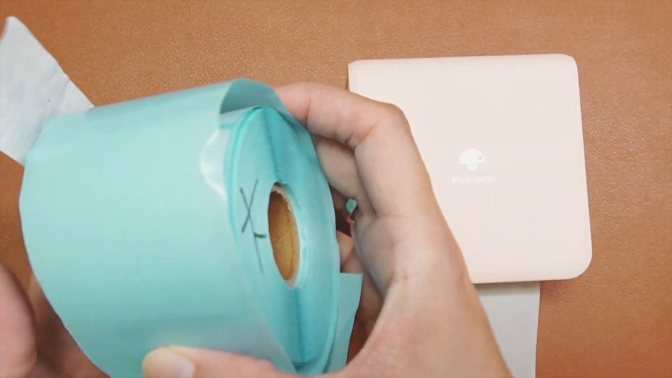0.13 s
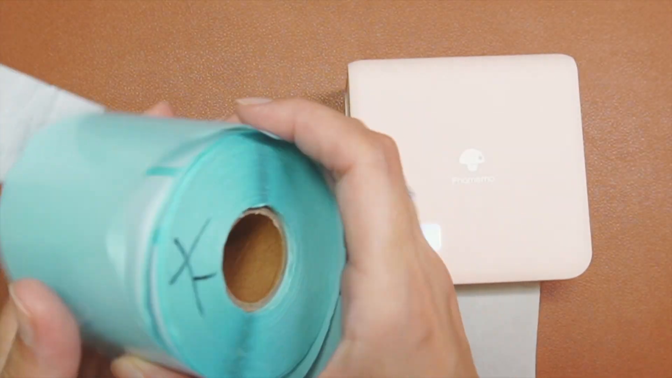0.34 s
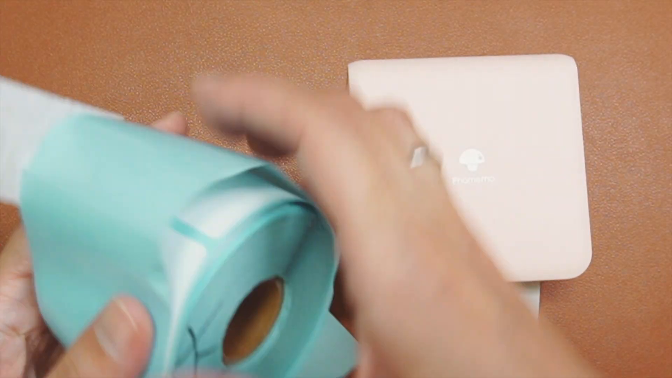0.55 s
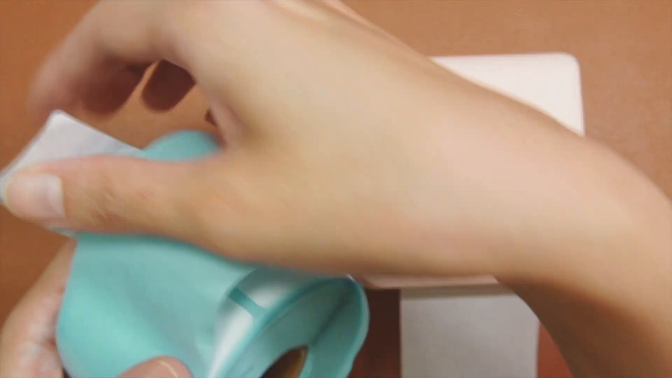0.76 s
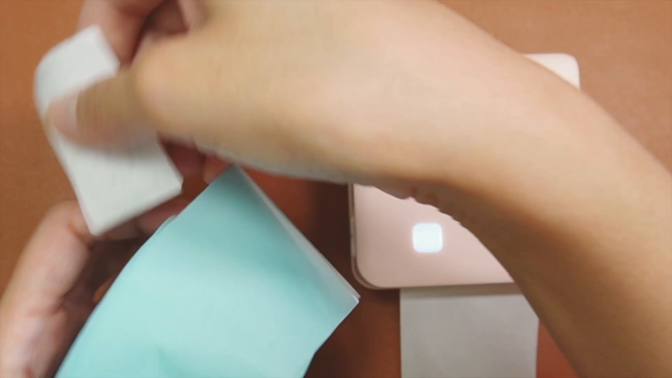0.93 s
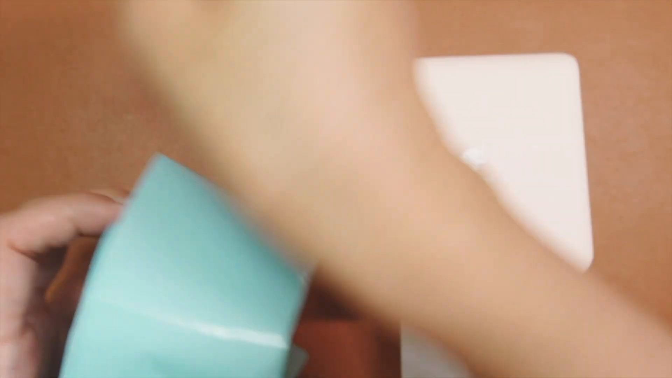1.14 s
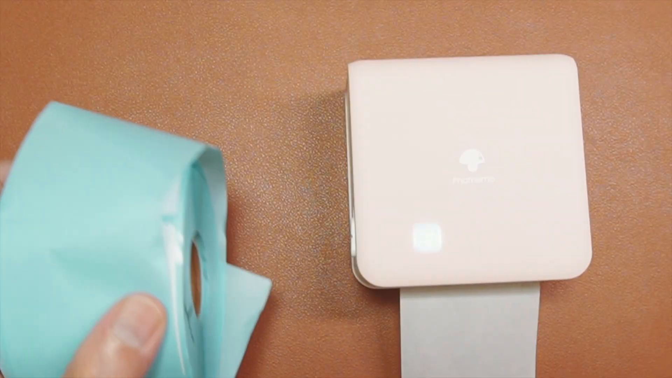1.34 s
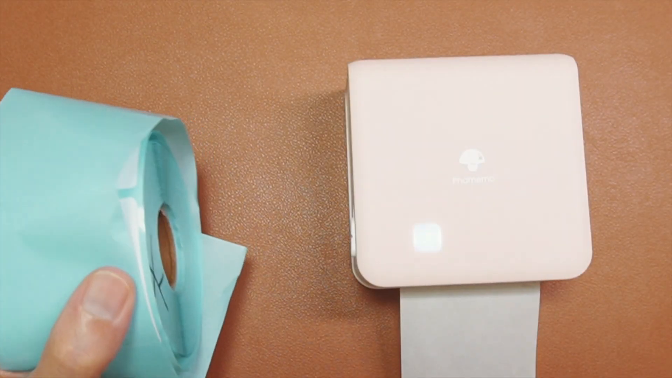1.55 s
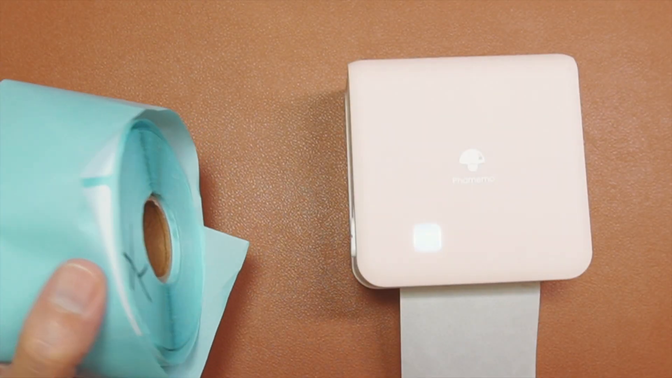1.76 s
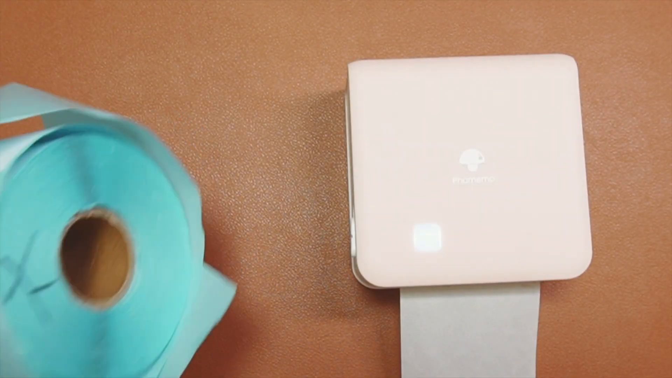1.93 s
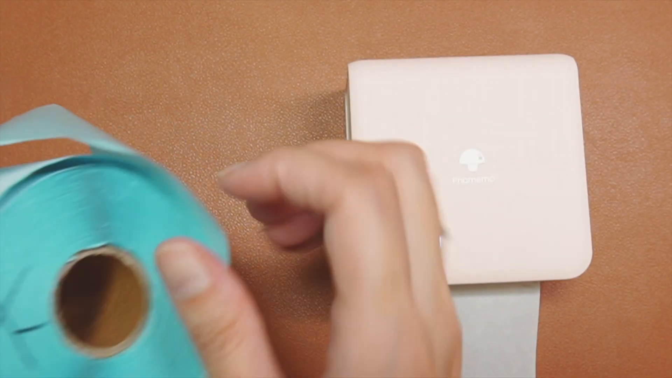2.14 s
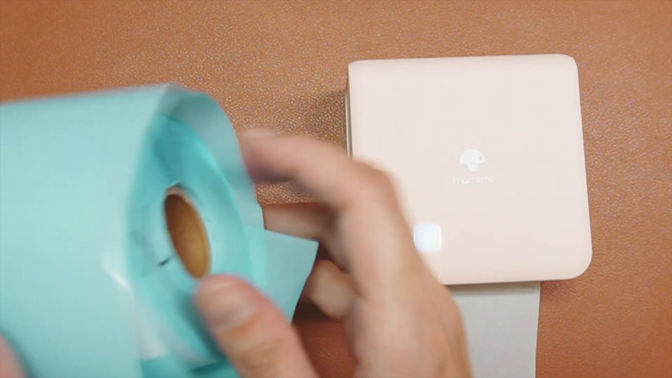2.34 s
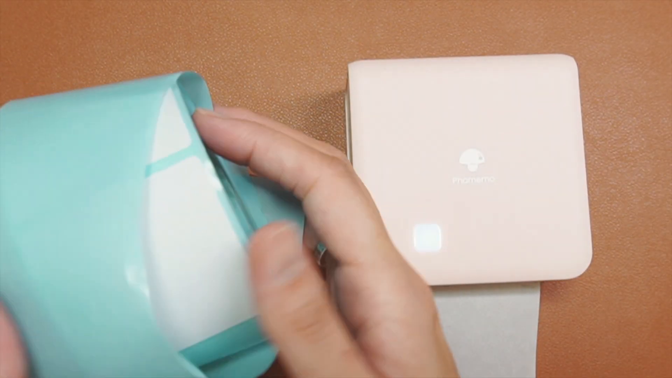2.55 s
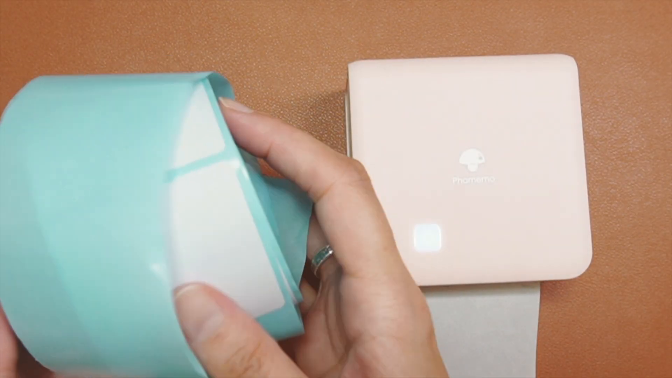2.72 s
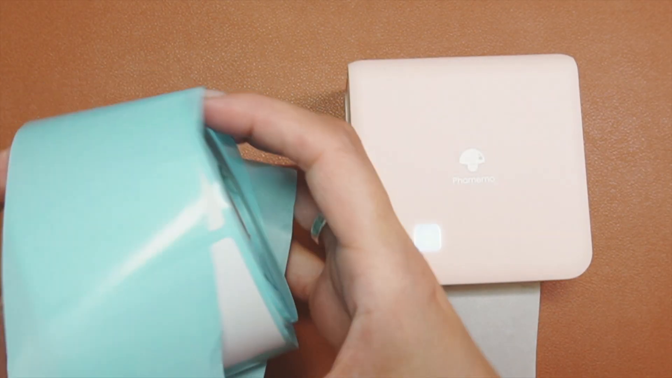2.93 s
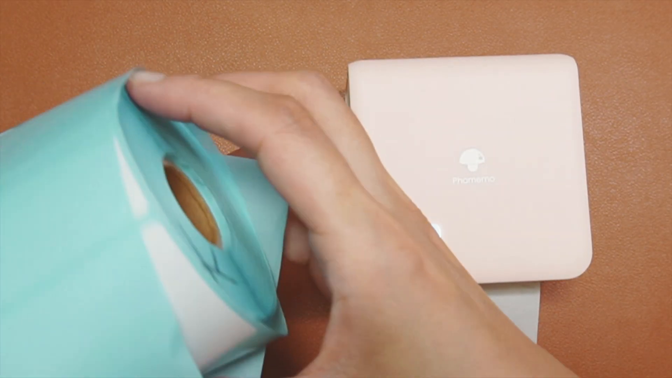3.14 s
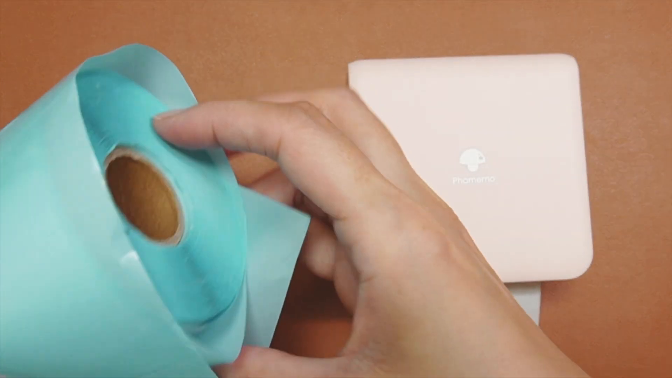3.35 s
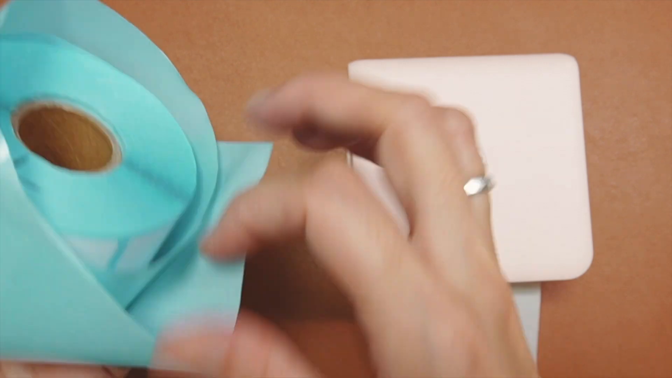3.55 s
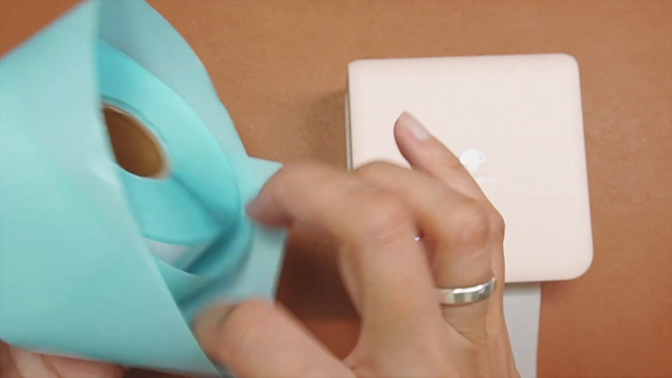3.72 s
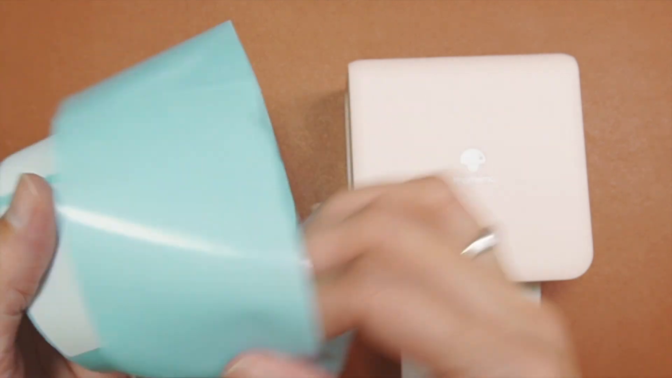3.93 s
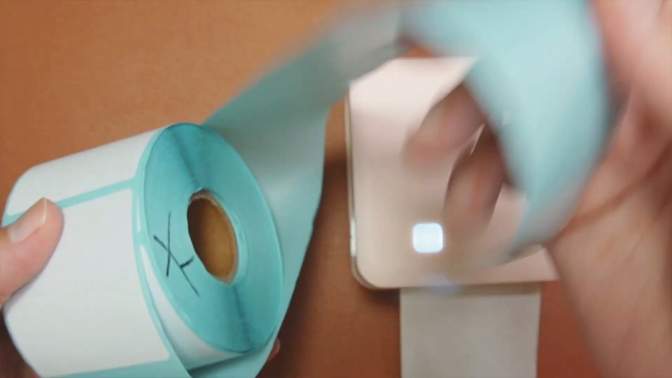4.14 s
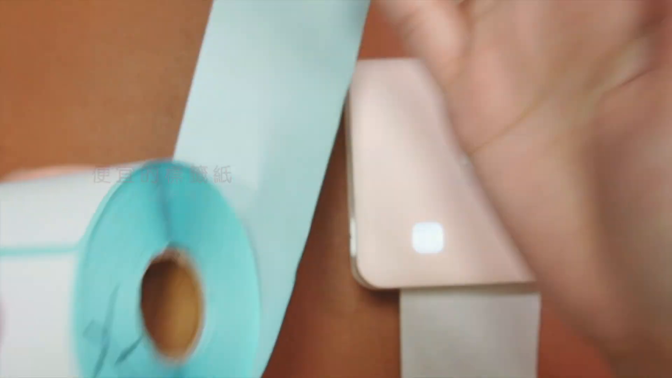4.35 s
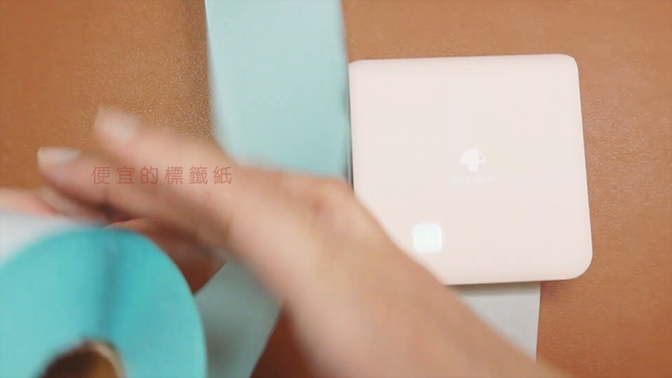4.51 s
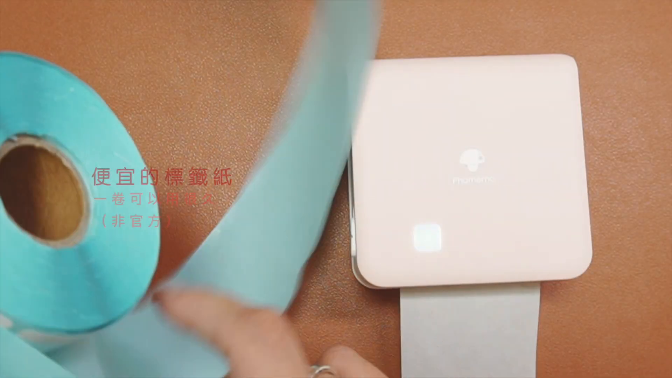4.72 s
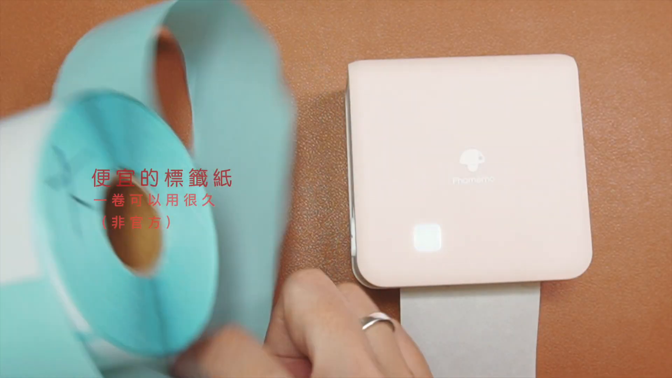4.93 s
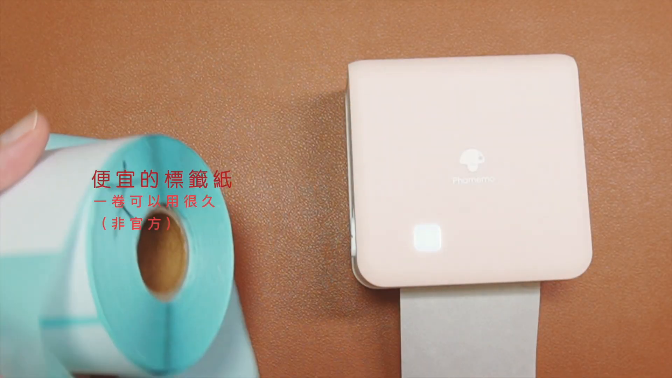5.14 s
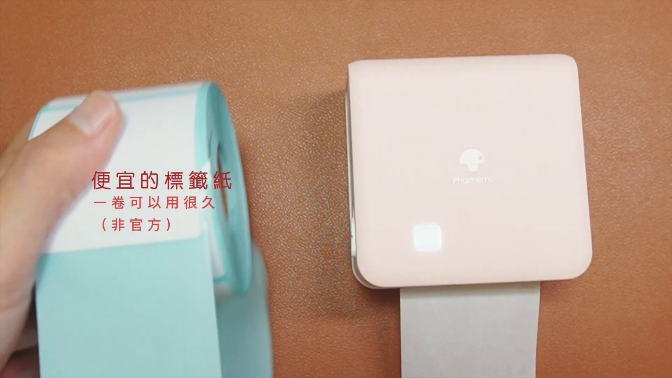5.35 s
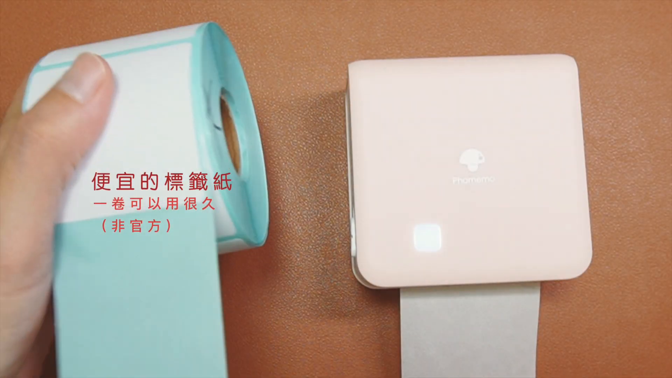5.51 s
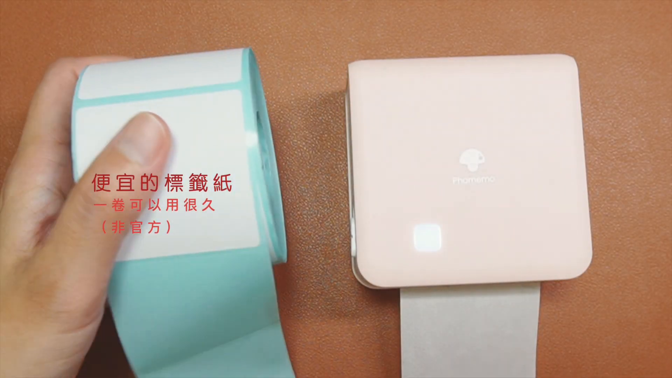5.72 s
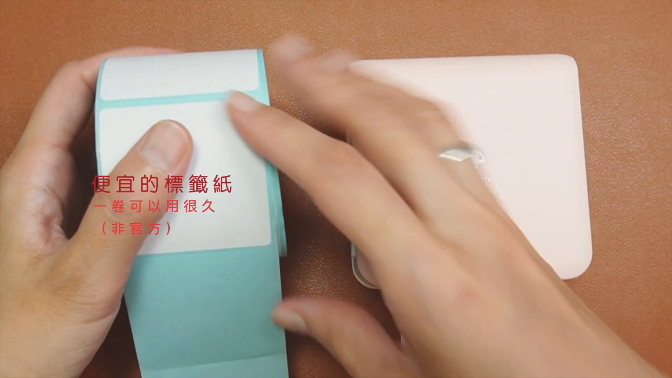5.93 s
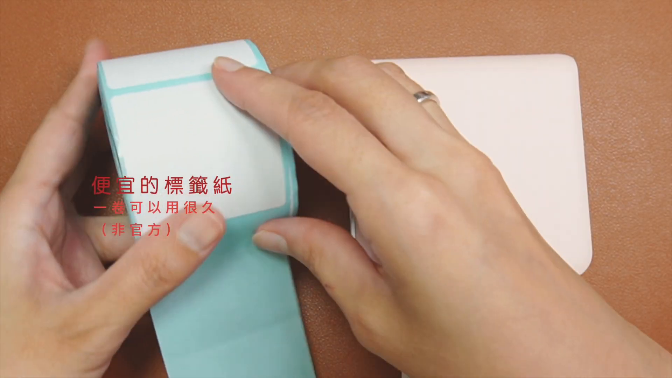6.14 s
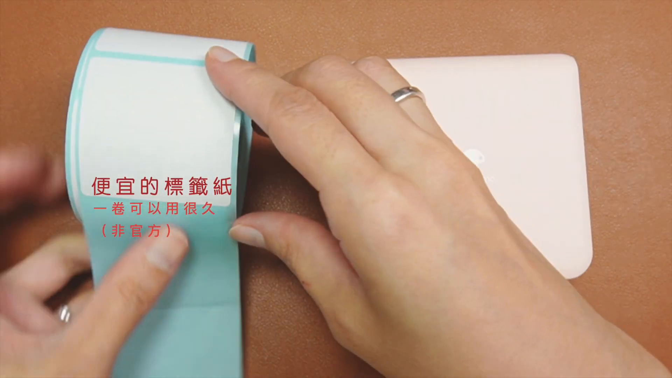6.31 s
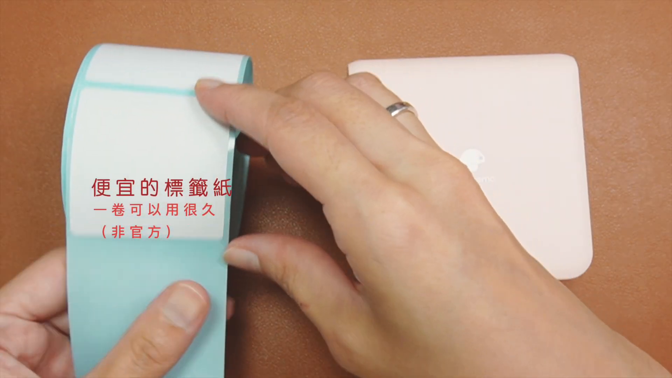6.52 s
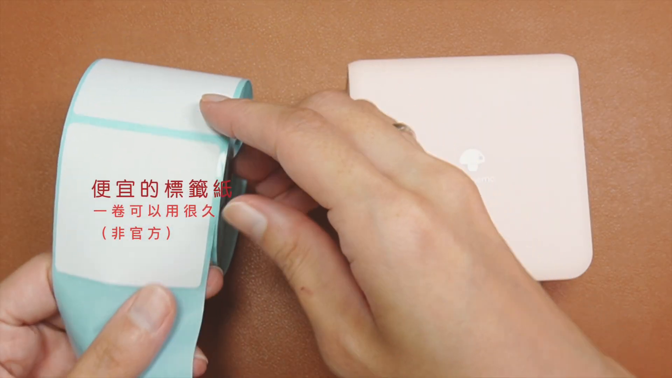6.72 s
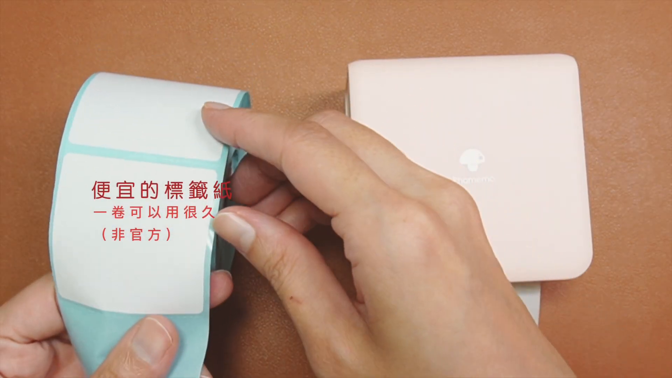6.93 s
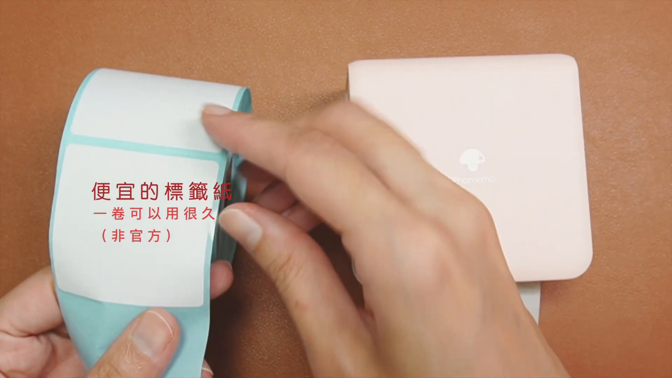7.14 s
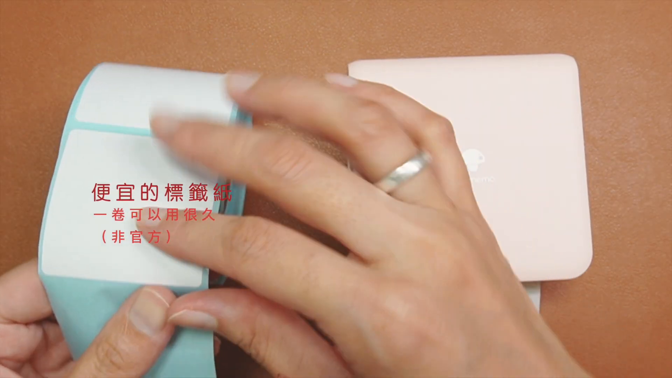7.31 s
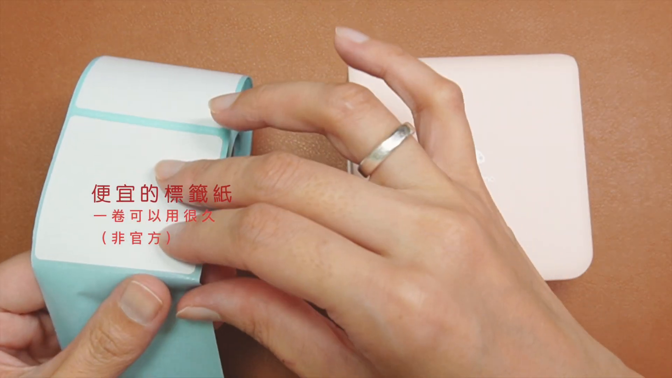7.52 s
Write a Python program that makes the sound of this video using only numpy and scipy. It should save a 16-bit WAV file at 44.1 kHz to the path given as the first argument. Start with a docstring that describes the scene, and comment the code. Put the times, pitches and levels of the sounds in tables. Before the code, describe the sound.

Close up on the left in a small quiet room, hands handle a roll of stiff label paper. Sparse soft rubs and crinkles come first, then a near pause, then firmer rustling. The middle grows into dense crackling and loud sliding as the strip is pulled loose, before fading to light isolated rubs and ticks over very faint room noise.

```python
"""At a desk in a small quiet room, hands turn a roll of label paper, pull its loose end free and wind it back.
The stiff strip slides over itself and the fingers: random grains make a hiss, coloured as the strip bends.
Creases large and small buckle as short runs of clicks, and dull knocks of fading noise sound, the low ones from
the roll. Scattered echoes answer over faint steady room noise; all of it is louder on the left."""
import sys
import numpy as np
from scipy import signal
from scipy.fft import rfft, irfft
from scipy.io import wavfile
from scipy.ndimage import uniform_filter1d

SR = 44100
rng = np.random.default_rng(int(sys.argv[2]) if len(sys.argv) > 2 else 0)


def persist_wave(psi):
    """Save psi, clipped to +-1, as 16-bit WAV."""
    counts = np.round(np.clip(psi, -1, 1) * 32767).astype(np.int16)
    wavfile.write(sys.argv[1], SR, np.atleast_2d(counts).T)


N = 338247

# strokes of sliding paper: start t/s, length t/s, level/dB, swell over the length/dB, body/dB, air/dB,
# ring of the curled strip f/Hz, ring level/dB, small crinkles/(1/s)
STROKE_ROWS = [(0.0, 0.087, -58.5, -4, 0, 3.5, 3610, 4.5, 10),
               (0.092, 0.086, -65, 10, -13, -4, 1420, 10, 14), (0.251, 0.13, -66, 5.5, -7, 2, 1870, 7, 17),
               (0.41, 0.024, -47.5, -5.5, -9, 2.5, 2410, 0, 41),
               (0.455, 0.112, -46.5, 0.5, -4, -1, 2100, 6.5, 7.5),
               (0.582, 0.068, -44, 3, -3, 1, 2230, 9.5, 16),
               (0.773, 0.076, -54.5, 7.5, 0, -0.5, 2640, 9, 26),
               (0.901, 0.14, -43.2, -11, 0.5, -1, 1000, 5, 22.5),
               (1.221, 0.035, -63, 8, -10, 1, 2120, 9, 32),
               (1.562, 0.12, -63.5, 7.5, 9, 6.5, 1010, 3, 16.5),
               (1.693, 0.21, -49, -14, 15, -4, 1650, 2, 28.5),
               (1.915, 0.075, -55, 1.5, 1, -2, 7130, 4, 14.5), (2.03, 0.2, -62, -9.5, 1, -8, 3590, 4, 16),
               (2.204, 0.078, -47.5, 3, -3, -5.5, 6540, 8, 12.5),
               (2.279, 0.12, -44, -2, 1.5, 3.5, 3250, 7.5, 3.5),
               (2.422, 0.14, -55.5, 16.5, 1, -0.5, 1730, 3, 6),
               (2.532, 0.11, -46.5, -6, -1, 1.5, 1880, 8, 11), (2.703, 0.171, -47, -8, -6, 0, 1650, 6, 18),
               (2.841, 0.24, -48, 5, -4.5, 0.5, 1800, 7, 21.5),
               (3.131, 0.23, -49.4, -3.5, -7.5, -1, 1770, 8.5, 14),
               (3.299, 0.089, -40.5, 2.5, -9, 0.5, 7020, 3, 0),
               (3.431, 0.11, -39.5, -5.5, -5, 4, 3150, 7, 9.5),
               (3.565, 0.066, -54, 4.5, -1, -1, 1000, 8, 0), (3.68, 0.17, -43.1, -20, -4, 4.5, 2030, 8, 14),
               (3.774, 0.077, -40, -15, 3, -2, 3300, 4, 16),
               (3.848, 0.15, -40.5, -4.5, 2.5, 3.5, 3260, 3, 5.5),
               (4.002, 0.15, -51.5, 9, 1, -3, 2880, 7.5, 17.5), (4.136, 0.099, -47, 0, -4, 7, 990, 0, 22),
               (4.253, 0.037, -41.5, 0.5, -15, 6.5, 1000, 4, 0),
               (4.324, 0.056, -63.5, 15, 6, -33, 3390, 3, 14), (4.4, 0.093, -41, 3.5, -1, -4, 990, 9, 35.5),
               (4.509, 0.15, -40.5, 3.5, 0, -3, 2500, -1.5, 21),
               (4.712, 0.22, -38, -7, 4, -1, 2030, 1, 18.5), (4.974, 0.2, -34.5, -15, 2, -0.5, 2540, 2, 4),
               (5.176, 0.055, -50.5, 0, 0, -1, 3600, 5, 0), (5.213, 0.14, -44, -2.5, -1.5, 1.5, 2560, 6, 0),
               (5.362, 0.081, -34, -7, 1.5, 0, 2360, 7.5, 13.5),
               (5.454, 0.16, -43.5, -5, -7, 0.5, 1110, 6, 14),
               (5.585, 0.067, -34.5, -12.5, 6, 0, 4720, 7, 14),
               (5.709, 0.22, -49, -10, 1.5, -13, 5550, 5.5, 22),
               (5.952, 0.099, -67, 21, 5, 3.5, 1750, 3, 22), (6.083, 0.37, -54, 1, -2, 1, 1920, 8, 12),
               (6.481, 0.14, -52.6, 2, -1.5, -5.5, 5640, 5, 21),
               (6.59, 0.15, -57.5, 4, 3.5, -8.5, 1620, 2, 16.5),
               (6.746, 0.16, -64, 6, 1, -6.5, 990, 1, 9.5),
               (7.127, 0.068, -59, 9.5, -6, -0.5, 3160, 9.5, 13),
               (7.231, 0.132, -60.5, 4, -3, -3, 2480, 5.5, 8),
               (7.376, 0.064, -48.5, -7, -3.5, -1, 2900, 4, 16),
               (7.446, 0.208, -56, -5.5, 4, -5.5, 7260, 5, 14.5)]


def gain_of(db):
    """Turns decibels into an amplitude factor."""
    return 10 ** (np.asarray(db) / 20)


def evened(x):
    """Scales a signal to an average strength (rms) of 1."""
    return x / np.sqrt(np.mean(x ** 2) + 1e-20)


def read(points, hz):
    """Reads a table between its points, along a logarithmic frequency axis."""
    f, value = np.transpose(points)
    return np.interp(np.log(hz + 1), np.log(f + 1), value)


def coloured(x, points):
    """Filters a sound by a table of frequency and level."""
    gain = gain_of(read(points, np.fft.rfftfreq(N, 1 / SR)))
    return irfft(rfft(x) * gain, N)


def add(mix, s, sound):
    """Adds a sound into the mix, starting at s seconds."""
    part = mix[max(round(s * SR), 0):][:len(sound)]
    part += sound[:len(part)]


def causal(db):
    """Builds the filter with these levels that answers at once and then rings out (minimum phase)."""
    log_gain = np.log(gain_of(np.r_[db, db[-2:0:-1]]))
    return np.exp(np.conj(signal.hilbert(log_gain)))[:len(db)]


def ripple(shape, size):
    """Makes smooth random hills and dips along the first axis, with rms 1."""
    noise = rng.standard_normal(shape)
    smooth = uniform_filter1d(noise, size, axis=0)
    return evened(uniform_filter1d(smooth, size, axis=0))


def sheet_db(spectrum, hz, body_db, air_db, ring_hz, ring_db,
             body_hz=1950, air_hz=6100, leak_hz=750, ring_width=0.12):
    """A wide loose patch of paper adds body, a tight one adds air; its curl makes one resonance."""
    # bass leaks round the edges of the sheet, so the body lies between leak_hz and body_hz
    body = 1 / (1 + (hz / body_hz) ** 6) - 1 / (1 + (hz / leak_hz) ** 6)
    air = 1 - 1 / (1 + (hz / air_hz) ** 6)
    ring = 1 / (1 + ((hz / ring_hz - 1) / ring_width) ** 2)
    return read(spectrum, hz) + body_db * body + air_db * air + ring_db * ring


def hush(level_db=-72, apart=.4):
    """Faint steady room noise: one noise shared by both sides plus a weaker one of each side's own."""
    # still air: f/Hz, relative level/(dB per Hz)
    hush_colour = [(25, -33), (70, -33), (130, -17.5), (210, -9.5), (300, -12), (420, -2), (600, -2),
                   (1050, -1), (2000, 0.5), (6000, -5.5), (10000, -12), (15500, -18.5)]
    shared = rng.standard_normal(N)
    own = rng.standard_normal((2, N))
    return gain_of(level_db) * evened(coloured(shared + apart * own, hush_colour))


def stroke_power(t, start, length, db, swell_db, attack_s=0.022, release_db_per_s=400.5):
    """A stroke grips quickly, swells or eases while the hand moves, then the strip coasts to rest."""
    grip = np.clip((t - start) / attack_s + .5, 0, 1)
    held_db = db + swell_db * np.clip((t - start) / length, 0, 1)
    fall_db = release_db_per_s * np.maximum(t - start - length, 0)
    return (grip * gain_of(held_db - fall_db)) ** 2 + 1e-14


def slide(level_db=0.6, grains_per_s=7000, grain_db=3.0, fibre_db=-7,
          clump_db=1.22, hard_clump_db=1.5, patch_db=2.5):
    """Fibres catch and let go, in rougher clumps when pulled hard; the colour drifts as the strip bends."""
    # rubbed sheet: f/Hz, relative level/(dB per Hz)
    rubbed_colour = [(30, -66), (100, -57), (200, -43), (330, -40.5), (500, -25.5), (750, -17), (1300, -8),
                     (2100, -5), (3000, -1), (5000, -2.5), (7000, -6), (10000, -11.5), (15500, -21.5)]
    hits = (rng.random(N) < grains_per_s / SR) * rng.choice([-1, 1], N)
    grains = hits * gain_of(grain_db * np.minimum(rng.exponential(1, N), 5))
    drive = evened(grains) + gain_of(fibre_db) * rng.standard_normal(N)
    hz, t, z = signal.stft(drive, SR, nperseg=512, noverlap=384)

    powers = np.array([stroke_power(t, *row[:4]) for row in STROKE_ROWS])
    total_power = powers.sum(0)
    shapes_db = np.array([sheet_db(rubbed_colour, hz, *row[4:8]) for row in STROKE_ROWS])
    bending_db = shapes_db.T @ (powers / total_power)  # the strongest stroke counts most
    drift = evened(uniform_filter1d(ripple(z.shape, size=2), size=12, axis=1))
    colour = gain_of(bending_db + patch_db * drift)
    even_colour = colour / np.linalg.norm(colour, axis=0)  # changes the tone, not the loudness
    rub = signal.istft(z * even_colour, SR, nperseg=512, noverlap=384)[1][:N]

    pull_db = np.interp(np.arange(N) / SR, t, 10 * np.log10(total_power))
    roughness_db = np.interp(pull_db, [-46, -34], [clump_db, hard_clump_db])
    clumps = gain_of(roughness_db * ripple(N, size=200))
    return evened(rub * clumps) * gain_of(level_db + pull_db)


def room(x, gap_s=.006, echoes_per_s=4000):
    """Scattered echoes from desk and walls; each band dies at its own speed, and the sides differ by band."""
    # time to die away by 60 dB: f/Hz, t/s
    decay_times = [(200, 1.3), (500, .5), (1200, 0.43), (3000, 0.32), (7000, 0.38), (15000, 0.4)]
    # echo strength: f/Hz, level/dB
    echo_levels = [(200, -10), (480, -8.5), (900, -9.5), (3000, -11.3), (7000, -11), (15000, -12)]
    # left-right likeness of the echoes: f/Hz, likeness (1 same, 0 unrelated, below 0 opposed)
    likeness = [(100, 0.795), (1000, 0.88), (4000, 0.85), (8000, 0.51), (15000, -.7)]
    present = rng.random((2, SR)) < echoes_per_s / SR
    taps = rng.standard_normal((2, SR)) * present * (np.arange(SR) > gap_s * SR)
    hz, t, (left, other) = signal.stft(evened(taps), SR, nperseg=256)
    alike = np.clip(read(likeness, hz), -1, 1)[:, None]
    right = alike * left + np.sqrt(1 - alike ** 2) * other

    t60 = read(decay_times, hz)[:, None]
    even_energy = np.sqrt(2 * np.log(1000) / (t60 * SR))  # a long tail is no stronger overall
    fade = 1000 ** (-t / t60) * even_energy
    strength = gain_of(read(echo_levels, hz))[:, None]
    tail = signal.istft(np.array([left, right]) * fade * strength, SR, nperseg=256)[1]
    return signal.fftconvolve(x[None], tail, axes=1)[:, :N]


def crease(length, shape, clicks_per_s=4200, spread_db=4, fade_db=17, crest=0.3, ripple_db=3, size=4096):
    """A fold runs through the sheet as a train of clicks that ring the bent patch."""
    # buckling sheet: f/Hz, relative level/(dB per Hz)
    paper_colour = [(30, -71), (100, -61.5), (200, -46), (330, -38.5), (500, -26), (750, -18), (1300, -8),
                    (2100, -5), (3000, -0.5), (5000, -2.5), (7000, -5.5), (10000, -12), (15500, -23)]
    hz = np.fft.rfftfreq(size, 1 / SR)
    span = int(np.clip(length * SR, 8, size / 2))
    place = np.r_[0, rng.random(size)][:2 + int(length * clicks_per_s)]  # 0 to 1 along the fold
    chance = rng.standard_normal((size, 2))[:len(place)]
    # the fold gathers speed, snaps through at the crest and runs out
    click_db = spread_db * np.clip(chance[:, 1], -2, 2) - fade_db * abs(place - crest)
    sizes = np.sign(chance[:, 0]) * gain_of(click_db)
    clicks = np.bincount((place * span).astype(int), sizes, size)
    colour_db = sheet_db(paper_colour, hz, *shape) + ripple_db * ripple(len(hz), size=22)
    ringing = irfft(rfft(clicks) * causal(colour_db))
    return evened(ringing) * np.sqrt(span / size)  # as much energy as rms 1 over the span


def crinkles(count=8, length_s=.007):
    """Small creases give way at random during a stroke, following its strength and brightness."""
    lowest_db, highest_db = -2.75, 4.25  # range of levels relative to the stroke
    low_ring_hz, high_ring_hz, ring_db = 1700, 6000, 5
    out = np.zeros(N)
    for start, length, db, swell_db, body_db, air_db, *_, per_s in STROKE_ROWS:
        for k, (when, size, patch) in enumerate(rng.random((count, 3))):
            into = (k + when) / max(per_s, 1e-3)  # seconds after the stroke starts
            if into >= length:
                continue
            ring_hz = low_ring_hz * (high_ring_hz / low_ring_hz) ** patch
            click = crease(length_s, (body_db, air_db, ring_hz, ring_db))
            stroke_db = db + swell_db * into / length
            lift_db = lowest_db + (highest_db - lowest_db) * size
            add(out, start + into, gain_of(stroke_db + lift_db) * click)
    return out


def creases(level_db=0.5):
    """Large folds buckle loudly, each a run of clicks with its own length and colour."""
    # buckling creases: t/s, level before level_db/dB, length t/s, body/dB, air/dB,
    # ring of the bent patch f/Hz, ring level/dB
    crease_rows = [(0.055, -54.5, 0.0099, -6, 0, 2100, 8), (0.1214, -49.5, 0.0045, 1, -19, 3300, 10),
                   (0.2843, -53, 0.016, -6, 9, 4010, 6), (0.3086, -55.5, 0.0134, -11, -10, 2620, 12),
                   (0.4853, -31.5, 0.0061, -14.5, -1, 2220, 17), (0.4915, -34.5, 0.011, -14, 5.5, 2770, 14),
                   (0.513, -37.5, 0.0054, 7, -20, 1520, 9), (0.5495, -41, 0.0073, -5, 1, 3140, 8),
                   (0.5844, -36.5, 0.019, -21, 2.5, 2290, 7), (0.61, -46.4, 0.0107, 6, 11, 7200, 10),
                   (0.6387, -36.5, 0.015, -11.5, -1, 1430, 15), (0.7978, -45.5, 0.013, -10, -3, 6200, 7),
                   (0.827, -48.6, 0.009, -5, -5, 6550, 8), (0.843, -43.1, 0.0089, 3, 2, 3380, 7),
                   (0.8644, -39.5, 0.014, 3, -3, 1000, 3), (0.935, -37.5, 0.0113, -4, 1, 6470, 3),
                   (0.947, -38.5, 0.013, -6, -1, 1910, 13), (0.9925, -36.5, 0.022, 0.5, -1, 1200, 13),
                   (1.009, -37, 0.023, -9, 0.5, 1030, 9), (1.068, -50, 0.0049, 1, -14, 2500, 13),
                   (1.5913, -50.5, 0.02, 19, 9, 3580, 7), (1.613, -51, 0.0076, 11, -31, 2370, 11),
                   (1.6956, -34.5, 0.0062, -13, -10, 1190, 6), (1.703, -37.5, 0.011, 9.5, -4, 1600, 18),
                   (1.822, -45.5, 0.005, 10, -25, 990, 11), (1.9034, -49.5, 0.0085, 16, -20, 1560, 16),
                   (1.968, -49.5, 0.0069, 7, -20, 1380, 10), (2.218, -32.5, 0.0046, -12, -3, 3410, 7),
                   (2.235, -39, 0.004, -10, 1, 2620, 12), (2.2596, -37.9, 0.0147, -10, 2, 3700, 7),
                   (2.2682, -24.5, 0.0065, -2.5, 3, 3100, 12), (2.457, -42.5, 0.0127, 6, 2, 2900, 11),
                   (2.5305, -29.0, 0.0048, -5, -3, 1900, 8), (2.5474, -29, 0.0135, -11, 1, 1820, 13.5),
                   (2.602, -35.5, 0.0066, 0, -13, 1750, 17), (2.651, -41.5, 0.0094, 2, -2, 3110, 5),
                   (2.944, -40.1, 0.0103, 6, -1, 3250, 8), (3.0753, -39.5, 0.0049, -6, -2.5, 5900, 18),
                   (3.1023, -46, 0.022, 6.5, -9, 1720, -2), (3.2666, -45.0, 0.025, -2, 10, 3220, 18),
                   (3.3184, -32.5, 0.0066, 2, -7, 1420, -1), (3.335, -27, 0.0095, -5.5, -4, 6400, 6.5),
                   (3.562, -44.5, 0.016, -4, -8, 2100, 10), (3.6944, -25.5, 0.0084, 1.5, 9.5, 2360, 8.5),
                   (3.765, -27.5, 0.0086, -6.5, -6, 1500, -0.5), (3.817, -45, 0.0032, -4, 10, 5970, 6),
                   (4.0245, -37.5, 0.004, 9, -21, 1860, 10), (4.0422, -37.5, 0.02, -2, -3, 1580, 6),
                   (4.058, -33.5, 0.023, -5, 5.5, 4510, 4), (4.0729, -30.1, 0.016, -0.5, -2, 3420, 11.5),
                   (4.085, -26, 0.0053, -3, -5, 1780, 9), (4.1558, -36.5, 0.009, 9, -7, 6180, 11),
                   (4.1652, -27.5, 0.0082, 0, -14.5, 7200, 5), (4.1765, -30, 0.0065, 12, 6, 3020, 9),
                   (4.1842, -26.5, 0.0058, 16.5, -2, 3870, 6), (4.3982, -30.5, 0.0055, -4, -13, 3060, 9),
                   (4.409, -28, 0.011, -2, -9.5, 5760, 1), (4.449, -29.7, 0.0146, -7, -9.5, 1340, 13),
                   (4.5014, -30.5, 0.013, 3, -18, 6540, 7.5), (4.513, -30, 0.017, 3.5, -2, 6000, 5),
                   (4.5246, -33, 0.011, 17, -6, 2280, 11), (4.541, -32.3, 0.018, 2, -7, 7200, 1),
                   (4.547, -34, 0.019, -1, -17, 2460, 4), (4.5826, -31, 0.021, -7, -4, 6540, -1),
                   (4.604, -31.0, 0.015, -1, -7, 3740, 0), (4.645, -27.5, 0.0047, -1, 7, 3320, 6),
                   (4.722, -33.5, 0.008, 1, -2, 2690, 3), (4.7304, -30, 0.0152, 2, -2, 3180, 2),
                   (4.7808, -27.5, 0.0084, -6, -4.5, 1000, 6.5), (4.7923, -29.5, 0.016, -11, -6, 6480, 4),
                   (4.85, -37, 0.017, 5, 1, 1410, 7), (4.883, -39, 0.005, -4, 8, 4250, 10),
                   (4.906, -28.5, 0.0059, -0.5, -2, 1900, 1), (4.9536, -24.5, 0.0048, -2.5, -2, 6400, 3),
                   (4.986, -27.3, 0.011, 2.5, 4, 3930, 8), (5.079, -40, 0.023, 3.5, -5, 7150, 2),
                   (5.149, -41.5, 0.0037, -10, -12, 4360, 2), (5.172, -36, 0.0056, 1, 4, 3270, 12),
                   (5.2094, -38.4, 0.0071, -2, -6, 2550, 5), (5.2633, -30.8, 0.011, -17, 2.5, 1670, 3),
                   (5.2849, -37.5, 0.0085, -3, 1, 5400, 12), (5.302, -27.0, 0.0087, 2, -6, 7100, 5),
                   (5.3884, -28.0, 0.0086, -9, -10, 4300, 9), (5.4365, -32.5, 0.0055, 2, -6, 4450, 11),
                   (5.5692, -24, 0.008, -7.5, 0, 5340, 8.5), (5.6546, -36.5, 0.017, 2, -16, 4260, 5),
                   (5.7735, -39.5, 0.013, -8, -28, 4170, 9.5), (5.7845, -40, 0.013, 0, -31, 7200, 6),
                   (5.7983, -44.5, 0.0098, 0, -28, 7200, 14), (5.86, -52, 0.025, -11, -13, 5000, 2),
                   (5.9908, -37.5, 0.007, -3, 14, 5500, 6), (6.0243, -38, 0.007, 3.5, -26, 6730, 6),
                   (6.4855, -36, 0.0068, -4.5, -12.5, 7200, 7), (6.604, -29.5, 0.0083, 13.5, 4.5, 3840, 14),
                   (6.612, -40, 0.012, 4, -6, 1595, 9), (6.8123, -43, 0.0071, 15, -30, 2380, 7),
                   (6.8737, -46.5, 0.0058, 9, -17, 2530, 3), (7.2985, -48.5, 0.02, 0, -13, 3240, 11),
                   (7.527, -43.5, 0.0052, -3, -31, 3630, 6), (7.6275, -37, 0.0056, -5, -1, 2730, 4.5)]
    out = np.zeros(N)
    for s, db, length, *shape in crease_rows:
        add(out, s, gain_of(db + level_db) * crease(length, shape))
    return out


def bumps(width=0.28):
    """Dull knocks of fading noise, each a band around its own pitch: the low, slow ones come as the roll bumps
    the hand and its tight layers shuffle and settle; the short, higher ones are brief dull taps."""
    # knocks: t/s, starting level/dB, pitch f/Hz, time to die away by 60 dB t/s
    bump_rows = [(.52, -75, 430, 0.49), (.92, -71, 420, 0.54), (1.699, -71, 385, 0.54),
                 (3.333, -56, 720, 0.053), (3.695, -48, 930, 0.064), (4.185, -34, 1090, 0.043),
                 (4.74, -66, 377, 0.52), (6.117, -54, 1500, 0.054), (6.143, -60, 840, 0.049)]
    out = np.zeros(N)
    t, hz = np.arange(SR) / SR, np.fft.rfftfreq(SR, 1 / SR)
    for s, db, pitch_hz, t60 in bump_rows:
        fade = 1000 ** (-t / t60)
        off_pitch = (hz / pitch_hz - 1) / width
        band_db = np.maximum(-20 * np.log10(1 + off_pitch ** 4), -80)
        burst = rng.standard_normal(SR) * fade
        knock = irfft(rfft(burst) * causal(band_db), SR)
        add(out, s, gain_of(db) * evened(knock) * np.sqrt(np.mean(fade ** 2)))
    return out


def scene():
    """Adds the paper, its echoes and the still air, then makes the left side louder."""
    # balance: f/Hz, left minus right level/dB
    balance = [(60, 6), (500, 7), (4000, 7), (8000, 7), (14000, 6)]
    paper = slide() + creases() + crinkles() + bumps()
    both = rfft(paper + room(paper) + hush())
    lean = gain_of(read(balance, np.fft.rfftfreq(N, 1 / SR)))
    sides = np.array([2 * lean, 2 * np.ones_like(lean)]) / (1 + lean)  # the two gains average 1
    return irfft(both * sides, N)


def record(dry, edge_hz=15850):
    """A steep low-pass filter ends the treble near edge_hz."""
    low_pass = signal.firwin(511, edge_hz, window=("kaiser", 9), fs=SR)
    return signal.oaconvolve(dry, low_pass[None], "same")


dry = scene()
out = record(dry)
persist_wave(out)
```